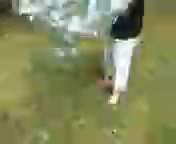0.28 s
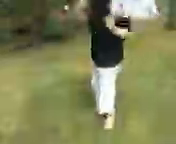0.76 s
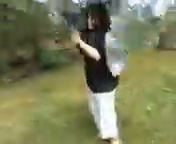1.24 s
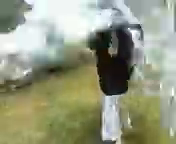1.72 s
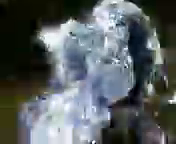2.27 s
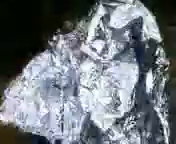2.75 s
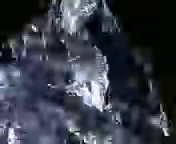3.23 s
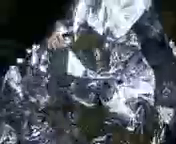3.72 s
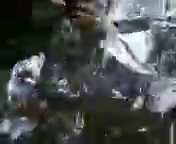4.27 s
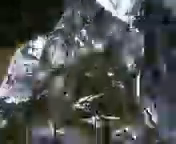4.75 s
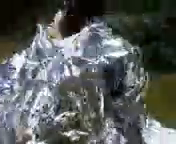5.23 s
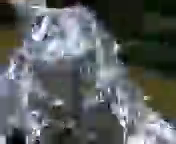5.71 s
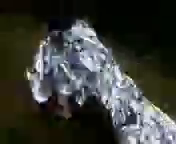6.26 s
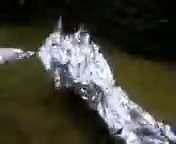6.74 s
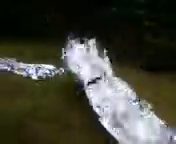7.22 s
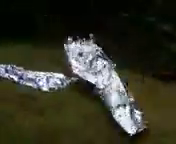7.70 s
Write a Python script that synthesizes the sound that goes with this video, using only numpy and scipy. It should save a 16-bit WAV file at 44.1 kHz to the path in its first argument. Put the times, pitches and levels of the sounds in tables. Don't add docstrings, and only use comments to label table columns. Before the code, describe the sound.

A large thin foil blanket is handled close to a low-quality microphone outdoors, dry, with no echo and little treble above about four kilohertz. At 0 seconds it crashes in with a dense, clipped crackle, falling quickly within half a second to a lighter, continuous crinkling with small flaps. From 1 to 3.5 seconds the rustle stays moderate, with brief shakes around 2.5 to 3. Near 3.9 a sharp tug snaps, and at 4.1 to 4.2 comes a violent burst of hard, overloaded cracks. It drops back, with another crisp snap at 5.0, low air thumps around 5.5 to 5.7, a broad rustling swell at 6.1 to 6.4, and further shakes near 7.0, 7.3 and the end. Underneath, a distant engine holds one low, wavering, slowly sinking note over dull rumble, clearest in the quieter gaps and rising at the end.

```python
import sys
import numpy as np
from scipy import signal
from scipy.fft import rfft, irfft, next_fast_len
from scipy.io import wavfile
from scipy.ndimage import uniform_filter1d

SR = 44100
rng = np.random.default_rng(int(sys.argv[2]) if len(sys.argv) > 2 else 0)


def undo_db(level):
    steps = np.asarray(level, float) / 20
    return 10 ** steps


def transcribe(u):
    v = np.clip(np.atleast_2d(u).T, -1, 1)
    q = np.round(v * 32767).astype(np.int16)
    wavfile.write(sys.argv[1], SR, q)


N = 351477

# (time [s], level [dB])
SWING = [(0.0, -11.5), (0.5, -26.5), (1.04, -30.5), (1.15, -27.5), (1.55, -23), (1.75, -30.5), (2.4, -27.5),
         (3.4, -25.5), (3.62, -31), (4.07, -29.5), (4.25, -24.5), (4.77, -26), (5.1, -21), (5.55, -25),
         (5.82, -28.5), (6.5, -24.5), (7.1, -25.5), (7.48, -30)]
# (peak time [s], level [dB], rise [s], fall [s], brightness [dB])
FLAPS = [(0.44, -25.5, .03, .03, -4), (0.79, -27, 0.095, .04, -0.5), (2.15, -27, 0.039, .06, 0),
         (0.155, -23, 0.024, 0.047, -2), (2.57, -23, 0.089, 0.079, 1.5), (2.97, -23.5, 0.039, .04, -0.5),
         (3.21, -24, 0.071, .07, -2.5), (3.46, -23.5, 0.056, 0.091, -0.5), (3.75, -26.5, 0.095, 0.085, 1.5),
         (3.935, -15, 0.12, 0.027, -0.5), (4.005, -19, 0.032, .03, -1), (4.09, -17.5, 0.013, 0.053, 2),
         (4.176, -10.5, 0.02, 0.023, 2.5), (4.24, -20, 0.047, 0.019, -0.5), (4.45, -25, .025, 0.021, 2),
         (4.85, -27.5, 0.096, 0.064, -5), (5.012, -15.5, .03, 0.017, -3), (5.48, -28, .03, 0.06, 1),
         (6.09, -16, .06, 0.23, 0), (6.36, -19.5, .14, 0.098, -1.5), (6.95, -22, 0.059, 0.056, 0.5),
         (7.295, -17.5, 0.039, 0.08, 0.5), (7.62, -26.5, 0.1, 0.12, 1), (7.97, -24, 0.076, .05, 2)]
# (frequency [Hz], density [dB per Hz])
SHEET_COLOUR = [(150, -33), (260, -5.5), (463, -8.5), (1070, -7), (1500, -2.5), (1800, 1.5), (2530, -5.5),
                (3310, -6), (3500, 4.5), (4550, -7.5), (7700, -120)]
# (level at usual rustle [dB], share of swing followed [dB/dB], share of brightness [dB/dB])
FACETS = [
    (-34.5, .6, -.3),
    (-30.5, 0.89, -0.42),
    (-28.5, 0.93, -0.79),
    (-26, 1.05, 1),
]
# (time [s], peak [dB], pitch [Hz])
SNAPS = [(0.045, 4.5, 3290), (0.789, -8, 2760), (0.152, 4.5, 955), (2.556, -3.5, 2830), (2.571, -4.5, 1880),
         (7.35, -2.5, 3340), (2.97, -6.5, 1910), (0.027, 4.5, 1107), (3.898, 0.5, 748), (3.911, 2, 1806),
         (3.935, 6.5, 1830), (3.985, -4.5, 1940), (4.004, -1, 1910), (4.086, 0.5, 3520), (4.111, 3, 3470),
         (4.117, 5, 1860), (4.134, -3, 3350), (4.154, 2, 3294), (4.382, -2, 2930), (4.799, -8, 2460),
         (4.825, -5, 1090), (4.934, -7, 975), (4.989, -2, 3210), (6.033, -6, 3250), (6.089, 1, 2230),
         (6.163, -3, 1644), (6.695, -6, 3210), (6.778, -6.5, 1700), (6.936, -7.5, 794), (7.277, -5, 3350)]
# (time [s], peak [dB], pitch [Hz])
CRACKS = [(0.0078, -1, 2000), (0.0138, -1.5, 1500), (4.0866, -4.3, 2900), (4.1345, -4, 1900),
          (4.1415, -4.5, 1900), (4.1494, -3, 3300), (4.1555, -3.5, 2200), (4.1606, -2.6, 1900),
          (4.1683, -3, 2500), (4.1714, -2.5, 3300), (4.1753, -4, 1700), (4.1803, -3, 2200)]
# (time [s], peak [dB], pitch [Hz], width [s])
PUFFS = [
    (3.909, -26.5, 200, .015),
    (4.24, -24, 189, .02),
    (5.451, -14, 130, 0.0063),
    (5.563, -23.5, 94, .012),
    (5.665, -23, 90.3, 0.014),
    (5.71, -22.5, 108, .01),
    (7.75, -36.5, 80, 0.011),
]
# (time [s], level [dB])
DRONE = [(0.0, -35.5), (0.15, -47), (0.4, -31.5), (1.0, -29), (1.75, -28.5), (2.55, -32.5), (3.1, -31.5),
         (3.4, -35), (3.7, -30), (4.15, -25), (4.93, -24.5), (5.4, -31), (5.7, -31), (6.2, -33),
         (6.55, -30), (7.15, -27.5), (7.35, -33), (7.97, -22)]
# (multiple of note [1], level re note [dB], change [dB/s])
ORDERS = [
    (1.5, -16, -1.6),
    (2.0, -27, 1.3),
]
# (frequency [Hz], gain [dB])
RESPONSE = [(0, -30), (30, 0), (70, -1), (200, 0), (3150, 0), (3400, 3), (3520, -2), (4000, -18),
            (4450, -33), (4600, -46), (4690, -90), (22050, -120)]

USUAL_RUSTLE_DB = -25
START_HZ, SAG_HZ_PER_S = 147.2, 1.72
RUMBLE_DB, RUMBLE_FOLLOWS = -37.5, 0.39
DEEP_DB, DEEP_RISE_DB_PER_S = -39, 0.5
OVERLOAD = 0.715


def rms_one(x):
    return x / np.sqrt(np.mean(x ** 2) + 1e-20)


def in_time(rows):
    time_s, *columns = np.transpose(rows)
    return [np.interp(np.arange(N) / SR, time_s, column) for column in columns]


def drift(rate_hz):
    pole = np.exp(-80 * np.pi * rate_hz / SR)
    noise = rng.standard_normal(N // 40 + 2002)
    slow = signal.lfilter([1], [1, -2 * pole, pole * pole], noise)[2000:]
    return np.interp(np.arange(N) / 40, np.arange(len(slow)), rms_one(slow))


def ring(clicks, hz, t60_s):
    radius, angle = undo_db(-60 / (t60_s * SR)), 2 * np.pi * hz / SR
    return signal.lfilter([0, np.sin(angle)], [1, -2 * radius * np.cos(angle), radius ** 2], clicks + 1e-18)


def band(x, low_hz, high_hz):
    return signal.sosfilt(signal.butter(2, [low_hz, high_hz], "band", fs=SR, output="sos"), x)


def motion():
    t = np.arange(0, N + 64, 64) / SR
    power = undo_db(2 * np.interp(t, *np.transpose(SWING)))
    tint = np.zeros(len(t))
    for peak_s, db, rise_s, fall_s, bright_db in FLAPS:
        width_s = np.where(t < peak_s, rise_s, fall_s)
        flap = undo_db(2 * db) * np.exp(-2 * ((t - peak_s) / width_s) ** 2)
        power = power + flap
        tint = tint + bright_db * flap
    return in_time(np.transpose([t, 10 * np.log10(power), tint / power]))


def random_sizes(spread_db, limit):
    return undo_db(spread_db * np.minimum(rng.exponential(1, N), limit)) * rng.choice([-1, 1], N)


def crinkle(level_db, bright_db, per_s, spread_db, cycles, clump_db, patchy_db):
    clumps = drift(45)
    clumps -= uniform_filter1d(clumps, size=SR // 12)
    popping = rng.random(N) < per_s / SR * undo_db(clump_db * clumps)
    pops = random_sizes(spread_db, 4) * popping
    pitches_hz = np.geomspace(280, 4900, 40)
    dealt = rng.integers(0, 40, N)
    colour_hz, colour_db = np.transpose(SHEET_COLOUR)
    groups = np.zeros((4, N))
    for k, hz in enumerate(pitches_hz):
        density_db = np.interp(np.log(min(hz, 3200)), np.log(colour_hz), colour_db)
        gain = undo_db(density_db) * np.sqrt(hz)
        facet = rms_one(ring(pops * (dealt == k), hz, cycles / hz))
        groups[np.searchsorted([700, 1400, 2400], hz)] += gain * facet * undo_db(patchy_db * drift(14))
    groups = signal.sosfilt(signal.butter(2, 230, "high", fs=SR, output="sos"), groups)
    foil = np.zeros(N)
    for (db, follows, tint), group in zip(FACETS, groups):
        group_db = db + follows * (level_db - USUAL_RUSTLE_DB) + tint * bright_db
        foil += undo_db(group_db) * rms_one(group)
    return foil


def snaps(events, cycles, flurry_s):
    out = np.zeros(N + 1000)
    decay = np.exp(-np.arange(1000) / SR / flurry_s)
    for time_s, db, hz in events:
        clicks = rng.standard_normal(1000) * decay
        tone = ring(clicks, hz, cycles / hz)
        crack = band(clicks, 500, 7000)
        burst = tone / np.abs(tone).max() + 0.5 * crack / np.abs(crack).max()
        start = round(time_s * SR)
        out[start:][:1000] += undo_db(db) * burst[:N + 1000 - start]
    return out[:N]


def ticks(level_db, per_s, re_rustle_db, spread_db):
    clicks = random_sizes(spread_db, 3) * (rng.random(N) < per_s / SR)
    return undo_db(level_db + re_rustle_db) * rms_one(band(clicks, 700, 5300))


def puffs():
    t = np.arange(N) / SR
    out = np.zeros(N)
    for time_s, db, hz, width_s in PUFFS:
        swell = np.exp(-((t - time_s) / width_s) ** 2)
        out += undo_db(db) * swell * np.sin(2 * np.pi * hz * (t - time_s))
    return out


def engine(waver_db, waver_hz):
    t = np.arange(N) / SR
    note_db, = in_time(DRONE)
    hz = START_HZ - SAG_HZ_PER_S * t + waver_hz * drift(16)
    phase = 2 * np.pi * np.cumsum(hz) / SR
    note = np.sin(phase)
    for multiple, db, db_per_s in ORDERS:
        note += undo_db(db + db_per_s * t + 5 * drift(2.5)) * np.sin(multiple * phase)
    note *= np.sqrt(2) * undo_db(note_db + waver_db * drift(9.8))
    upper_db = RUMBLE_DB + RUMBLE_FOLLOWS * (note_db + 31) + 1.4 * drift(3.5)
    deep_db = DEEP_DB + DEEP_RISE_DB_PER_S * (t - 4) + 1.5 * drift(3)
    upper = undo_db(upper_db) * rms_one(band(rng.standard_normal(N), 140, 261.4))
    deep = undo_db(deep_db) * rms_one(band(rng.standard_normal(N), 70, 135))
    breeze = undo_db(-55.5) * rms_one(band(rng.standard_normal(N), 18, 55))
    return note + upper + deep + breeze


def scene():
    level_db, bright_db = motion()
    foil = crinkle(level_db, bright_db, per_s=12000, spread_db=0.0, cycles=23.0, clump_db=1.5, patchy_db=2.48)
    foil += undo_db(-8.0) * snaps(SNAPS, cycles=17.0, flurry_s=0.0014)
    foil = 0.5 * np.tanh(foil / 0.5)
    foil += snaps(CRACKS, cycles=14.0, flurry_s=0.0004)
    foil += ticks(level_db, per_s=350, re_rustle_db=-8.5, spread_db=2.5)
    return (foil + puffs() + engine(waver_db=1.56, waver_hz=0.9))[None]


def top_cut(x):
    return signal.sosfilt(signal.butter(12, 16000, fs=SR, output="sos"), x)


def record(dry):
    size = next_fast_len(N + 4096)
    response = undo_db(np.interp(np.fft.rfftfreq(size, 1 / SR), *np.transpose(RESPONSE)))
    heard = irfft(rfft(dry, size) * response, size)[:, :N]
    mix = np.clip(heard, -OVERLOAD, OVERLOAD)
    return top_cut(mix)


dry = scene()
out = record(dry)
transcribe(out)
```